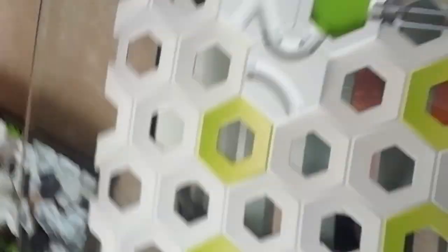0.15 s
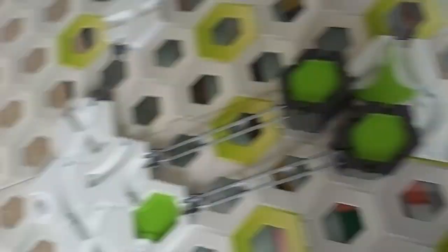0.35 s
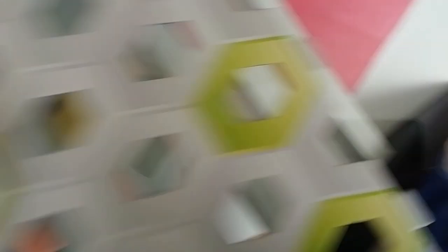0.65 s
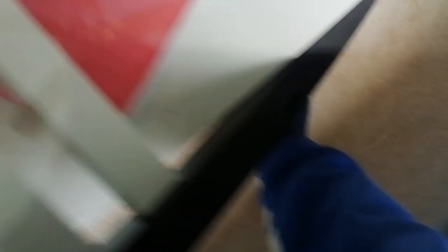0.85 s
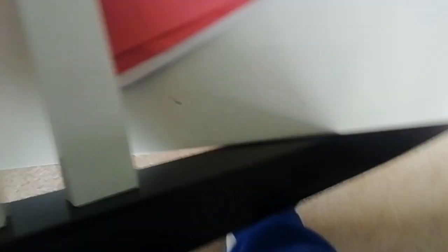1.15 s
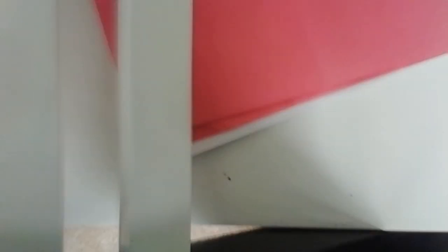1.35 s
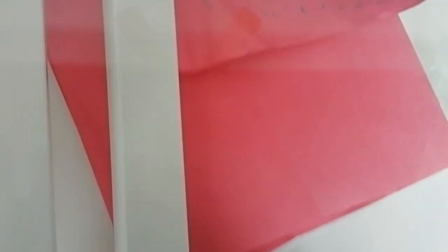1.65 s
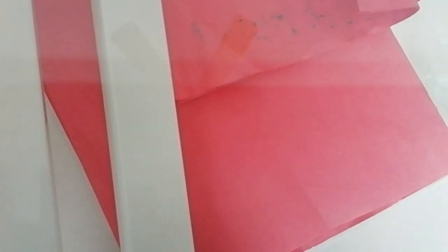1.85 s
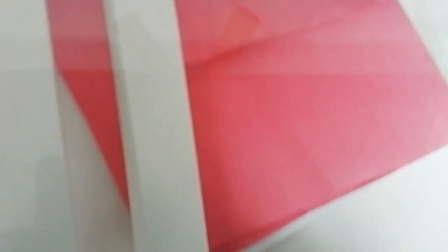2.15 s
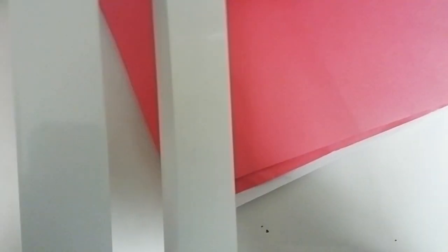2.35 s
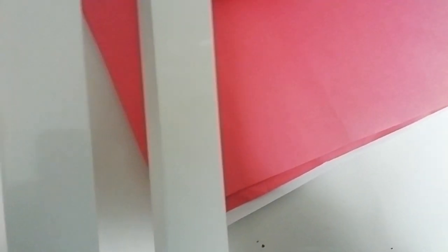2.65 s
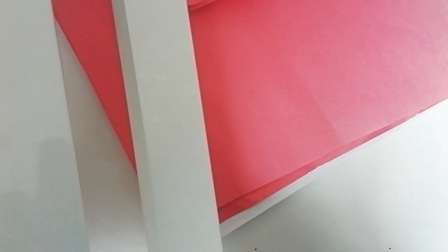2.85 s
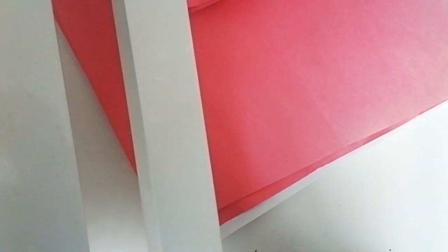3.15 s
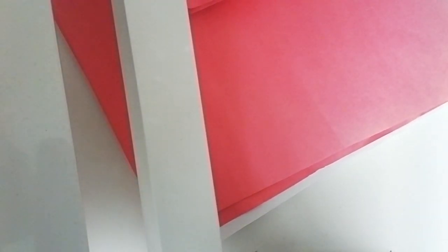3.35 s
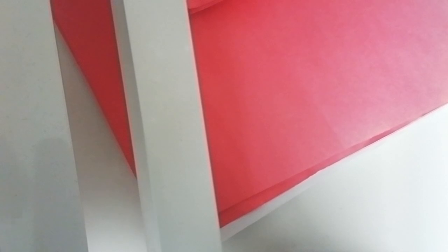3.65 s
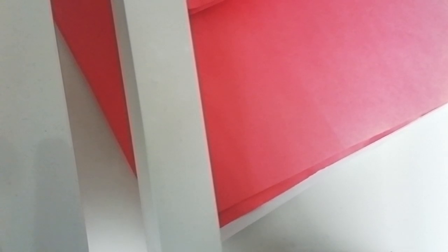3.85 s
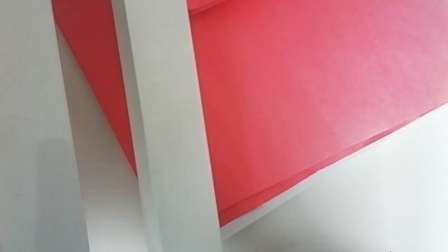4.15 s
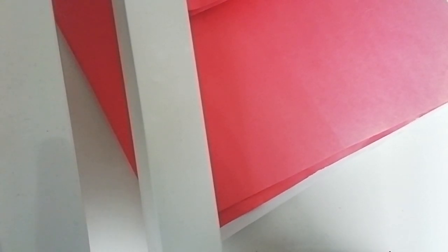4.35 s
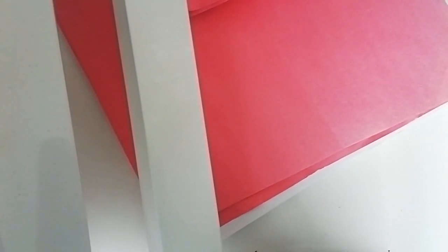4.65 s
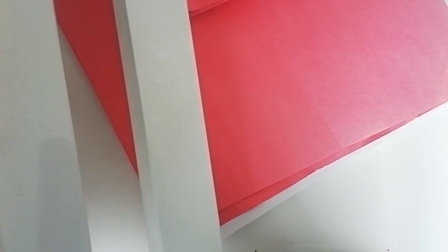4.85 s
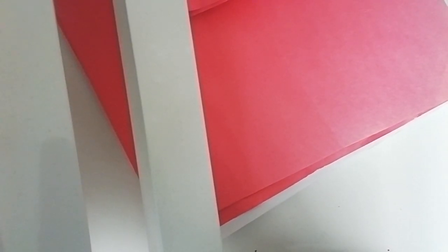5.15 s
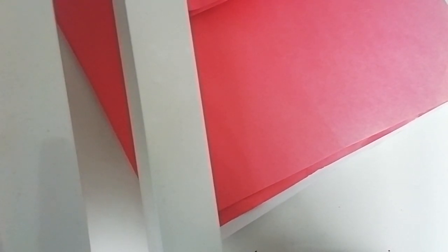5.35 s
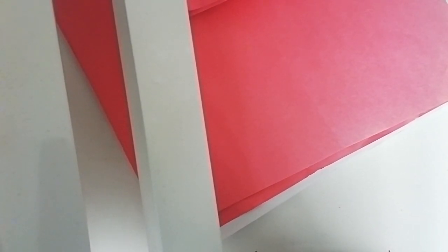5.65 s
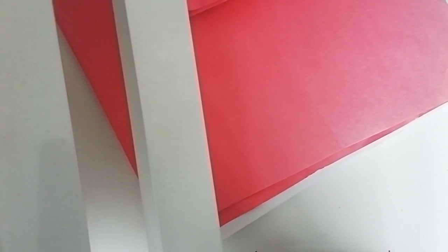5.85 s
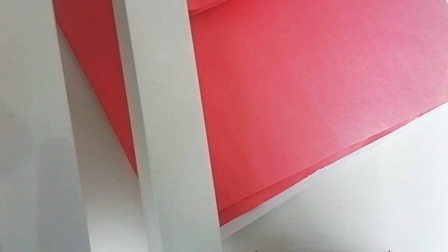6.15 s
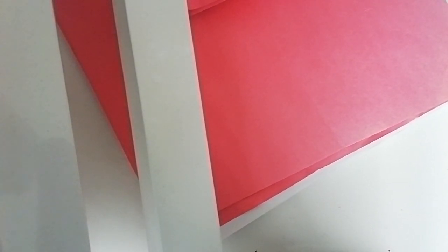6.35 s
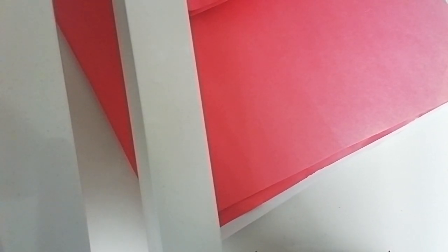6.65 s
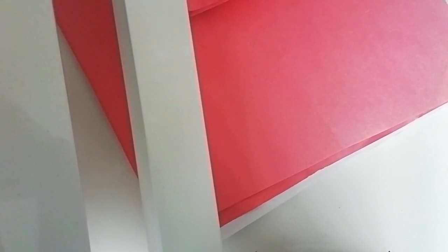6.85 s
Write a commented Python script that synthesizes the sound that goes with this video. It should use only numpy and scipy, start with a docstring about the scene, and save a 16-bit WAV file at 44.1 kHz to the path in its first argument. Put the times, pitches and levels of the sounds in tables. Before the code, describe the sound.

A hand-held phone is pushed into position beside a plastic marble run: soft padding, scuffs, sharp cracks and boomy bumps right at the microphone. Then it lies still in a quiet small room, while glass marbles and plastic pieces click irregularly nearby, with three loud glassy clinks in the middle and faint slides and creaks later. The left side is dull, the right open.

```python
"""Rubbing, bumps and hard knocks as a hand-held phone is pushed into place on a desk by a plastic marble run;
then glass marbles and plastic pieces click, creak and slide a little further off in a small room.
Contacts are band-split noise bursts with a ping; bumps are damped sines; rubbing is coloured grains and noise;
cup, joint and run ring as banks of decaying modes.
The right port is open; the left hears the sources through a low-pass, slightly late. Each port has its own hiss."""
import sys
import numpy as np
from scipy import signal
from scipy.fft import rfft, irfft
from scipy.io import wavfile
from scipy.ndimage import uniform_filter1d

SR = 44100
rng = np.random.default_rng(int(sys.argv[2]) if len(sys.argv) > 2 else 0)


def wav_record(signal):
    """Record a signal, one row per channel, as 16-bit PCM in the file named by sys.argv[1]."""
    frames = np.transpose(np.atleast_2d(signal))
    bounded = np.clip(frames, -1, 1)
    # unit amplitude maps onto the largest positive 16-bit level
    quanta = np.round(bounded * 32767).astype(np.int16)
    wavfile.write(sys.argv[1], SR, quanta)


N = 308700
TIME_S = np.arange(N) / SR

# Table levels hold before the mix gains.
# Strokes of skin and sleeve over the case. Each row: peak time in seconds, swell in seconds, release in seconds,
# hiss in dB, scuff in dB re hiss, fizz in dB re hiss.
RUB_STROKES = [(.46, 0.096, 0.16, -50, -10, -13), (.88, 0.287, 0.14, -62, -2.5, -12.5),
               (1.16, 0.24, 0.0505, -52.5, 5, -31.5), (1.52, 0.38, 0.36, -44.5, 3, -18.5),
               (1.664, 0.28, 0.14, -34, -8, -16), (1.84, 0.088, 0.064, -47.5, 6.5, -28),
               (2.005, .14, 0.047, -55.5, 5, -17), (2.19, 0.061, 0.204, -39, -22, -23),
               (2.26, 0.06, 0.1, -27.5, -7, -23.5), (2.317, 0.062, 0.044, -34.5, 0.5, -28),
               (2.68, .08, 0.44, -58, -4.5, -15.5), (3.14, 0.57, .3, -65.5, -6.5, -19)]
# The hand's tremble on the case. Each row: time in seconds, level in dB.
TREMBLE_LEVELS = [(0.0, -83), (0.13, -69), (0.65, -51), (0.88, -55), (1.1, -60), (1.25, -46.5),
                  (1.41, -45.5), (1.67, -46), (1.84, -62.5), (2.43, -55), (2.9, -72.5), (3.2, -73)]
# Hard knocks at the phone. Each row: start in seconds, level in dB, ping in Hz,
# weight (middle re treble) in dB, edge (top re treble) in dB.
KNOCKS = [(.0975, -62.5, 620, -3, -24.5), (.2433, -62.5, 4680, -9, -15), (.9483, -65, 710, -3, -22),
          (.9807, -61, 824, 4, -23), (1.0088, -56.5, 738.5, 6.5, -18), (1.0439, -20, 3230, -6, -19.5),
          (1.0708, -38, 1030, 5.5, -21.5), (1.1882, -53.5, 660, 1.5, -14), (1.2121, -18, 1770, -1, -18.5),
          (1.3776, -20.5, 4000, -1.5, -20.5), (1.644, -16, 1380, -1.5, -25.5), (1.7936, -38, 3470, -9, -20),
          (1.8034, -27, 2106, 3.5, -20.5), (2.3328, -22.5, 2950, -5.5, -23.5), (2.3885, -40, 4950, -43, -6),
          (2.4089, -49, 4540, -23, -12), (5.6909, -25.5, 3654, -21.5, -16.5)]
# Soft bumps through the case. Each row: start in seconds, envelope peak in dB, pitch in Hz, t60 in seconds.
BUMPS = [(.1, -47, 80, 0.034), (0.241, -46, 84, 0.037), (0.439, -34, 108, 0.062), (0.462, -27, 230, 0.0126),
         (0.474, -39.5, 63.5, 0.38), (.529, -30.5, 124, 0.037), (0.787, -38, 65, 0.16),
         (1.045, -17.5, 119, 0.024), (1.2132, -12.5, 80, 0.049), (1.246, -13.5, 90, 0.03),
         (1.378, -9, 70, .048), (1.646, -33, 140, 0.087), (1.803, -33, 100, 0.17), (2.235, -20, 65, 0.021),
         (2.339, -6, 52, .065), (2.344, -18, 213, 0.021), (2.752, -38, 250, 0.067),
         (2.765, -32, 95, 0.0985), (5.695, -44, 78, 0.1365), (5.695, -37.5, 295, 0.1187),
         (6.581, -43, 153, 0.092), (6.586, -49.5, 63, 0.248)]
# Fingertips padding on the case. Each row: start in seconds, level in dB.
FINGER_PADS = [(.4083, -71), (0.4426, -56), (0.4657, -61.5), (0.586, -60), (.6834, -63.5), (2.778, -67)]
# Loose marbles and pieces rattling after a jolt. Each row: start in seconds, length in seconds, level in dB.
RATTLES = [(1.216, 0.055, -22.5), (1.385, 0.01694, -20), (4.225, 0.016, -52), (5.71, 0.08, -51),
           (6.11, 0.085, -53), (6.19, .07, -47)]
# Marbles and pieces tapping in the room. Each row: start in seconds, level in dB, ping in Hz,
# weight (middle re treble) in dB, rebound in dB re the first contact.
TAPS = [(1.2283, -16, 4370, -7, -4.5), (1.2365, -16.5, 3933, -9, -13), (1.2608, -25.5, 4610, -17, -23.5),
        (1.297, -33, 3700, -4.5, -28), (1.3921, -18, 4090, -4, -11), (1.4691, -40.5, 3997, -3.5, -16.5),
        (3.1361, -65.5, 1953, 5.5, -21), (3.2601, -63, 2504, -7, -7), (3.7277, -66.5, 2242, 1, -11),
        (4.0109, -45, 4740, -6, -10.5), (4.108, -63, 3270, -3, -7), (4.1816, -57.5, 3665, -9, -3),
        (4.2289, -58, 1910, 2, -1.5), (4.3219, -52, 3430, -6.5, -6), (4.345, -51, 2620, -3.5, -3.5),
        (4.3883, -54, 1930, 0.5, -17), (4.426, -55, 4560, -8, -11.5), (5.174, -49.5, 2694, -18, -18),
        (5.213, -41.5, 5260, -4.5, -4.5), (5.257, -51, 5190, -8, -8), (5.4603, -49, 1070, 2, -18),
        (5.705, -38.5, 4137, -21.5, -6.5), (6.1047, -30, 4620, -11.5, -20), (6.1966, -52, 1250, 4.5, -5.5),
        (6.2209, -48.5, 3900, -3.5, -0.5), (6.5535, -56, 3920, -5, -4), (6.5828, -49, 2080, 1, -17.5),
        (6.8509, -53, 2470, 1.5, -23)]
# Tight plastic joints creaking. Each row: start in seconds, length in seconds, level in dB.
CREAKS = [(3.457, 0.089, -56), (6.708, 0.00796, -46.5), (6.731, 0.018, -54), (6.757, 0.021, -53),
          (6.797, 0.017, -51)]
# Pieces pushed along the desk. Each row: start in seconds, length in seconds, level in dB.
SLIDES = [(4.165, 0.1375, -60), (4.4, 0.047, -56.5), (5.289, 0.075, -64), (5.665, 0.0491, -62),
          (6.82, 0.084, -57)]
# Brief brushes of a hand on the plastic. Each row: start in seconds, length in seconds, level in dB.
BRUSHES = [(4.97, .055, -65.5), (5.64, 0.068, -63), (5.672, 0.059, -40), (5.81, 0.051, -60),
           (5.94, 0.086, -74)]
# A marble clicking into a plastic cup. Each row: start in seconds, level in dB, contact hardness (low-pass) in Hz.
CLINKS = [(4.4679, -13, 3100), (4.5327, -9.5, 5290), (4.596, -6.5, 4200)]

# Resonances of the plastic run and its desk, the cup, the joint. Each row: mode in Hz, level in dB, t60 in seconds.
RUN_MODES = [(308, -5.5, .22), (585, -10, .15), (829, -6, .12), (960, -4, .2), (1043, -2, .09),
             (1177, -1, .14), (1580, -4, .12), (2006, -3.5, .13), (2207, -6, .12), (2600, -5.5, .12),
             (3040, -3, .15), (3420, -1, .14), (3730, -2, .13), (4280, 0, .13), (4619, -3.5, .12)]
CUP_MODES = [(964, -15.5, 0.11), (1444, -14, 0.2), (2150, -8, 0.11), (2080, -5, 0.099), (2520, 1, 0.0427),
             (2750, 2.5, 0.041), (3070, 1, 0.041), (3880, -3, 0.065), (4390, -8, 0.25), (4850, 1.5, 0.046),
             (5380, -5, 0.11)]
JOINT_MODES = [(363, -4.5, 0.0555), (718, -11, 0.2), (1090, -12, 0.06), (1935, 2.5, 0.034),
               (2940, -4, 0.041), (3193, -5.5, 0.062), (4005, -1.5, 0.0395)]

# Relative spectra of the noises. Each row: frequency in Hz, gain in dB.
HISS_SPECTRUM = [(1200, -14.5), (2200, -7.5), (3300, -3), (4100, -2.5), (5000, -11.5), (6200, -18.5),
                 (10000, -41)]
SCUFF_SPECTRUM = [(120, -8.5), (250, 1), (550, -2), (750, -2.5), (1150, -1.5), (1900, -5.5), (3000, -45)]
FIZZ_SPECTRUM = [(4200, -22), (5800, -7.5), (8500, -0.5), (11000, -9), (16000, -14.5)]
RUMBLE_SPECTRUM = [(15, -10), (27, 5), (55, -9.5), (110, -12.5), (200, -21.5), (400, -34), (900, -54.5)]
SCRAPE_SPECTRUM = [(150, -14.5), (350, 1.5), (600, -1.5), (850, -5.5), (1300, -3), (1650, -15.5),
                   (2000, -9.5), (2600, -6.5), (4200, -4), (5500, -32.5), (10000, -38.5)]
RATTLE_SPECTRUM = [(400, -9), (1100, 2.5), (2000, -8), (4400, 3.5), (5600, -11.5), (8000, -27),
                   (15000, -41)]
AMBIENCE_SPECTRUM = [(12, -35), (20, -2), (70, -8.5), (297, -13.5), (340, -16), (613, -20), (686, -24.5),
                     (1180, -23), (1590, -28), (3280, -29.5), (4500, -30.5), (5850, -63.5), (9900, -120)]
PORT_SPECTRUM = [(100, 0), (2500, 3), (5000, 2), (10000, -1), (16000, -4.5)]
ROOM_SPECTRUM = [(150, 0), (500, 5), (1200, 5.5), (3000, 1.5), (5000, -4.5), (10000, -1)]

# Body, middle, treble and edge of a contact. Each row: lower limit in Hz, upper limit in Hz.
CONTACT_BANDS = [(180, 740), (870, 2100), (2200, 5200), (5000, 8000)]

AMBIENCE_DB = -63.5
WHINE_HZ, WHINE_DB = 1820, -79.5
LEFT_PORT_HZ, PORT_LAG_SAMPLES = 300, 23
TOP_HZ = 16000
BLOW_S, ONSET_S = .16, .01
RUB_FALL_DB = 20
BUMP_RISE_SHARE = 0.016  # of the t60
KNOCK_T60_S, TAP_T60_S = .026, .05  # at zero weight
NEAR_CRACK_DB, TAP_PING_T60_S = 3, .018
REBOUND_S, REBOUND_WEIGHT_DB = .0135, 2  # weight added to the first contact's
SPOT_SPREAD_DB, CUP_CRACK_T60_S = 1.5, .03


def undb(db):
    """Decibels to gain."""
    return 10 ** (np.asarray(db) / 20)


def unit(x):
    """Scale to rms 1."""
    return x / np.sqrt(np.mean(x ** 2))


def fade(t_s, t60_s):
    """Exponential decay, 60 dB down after t60."""
    return np.exp(-np.log(1000) * t_s / max(t60_s, 1e-3))


def colour(x, spectrum):
    """Filter by a spectrum, dB interpolated over log frequency."""
    hz, db = np.transpose(spectrum)
    bin_hz = np.maximum(np.fft.rfftfreq(len(x), 1 / SR), 1)
    gain = undb(np.interp(np.log(bin_hz), np.log(hz), db))
    return irfft(rfft(x) * gain, len(x))


def noise(spectrum):
    """Coloured noise of rms 1."""
    return unit(colour(rng.standard_normal(N), spectrum))


def walk(rate_hz):
    """Smooth random wander of rms 1: held random steps, averaged over one step."""
    hold = int(SR / rate_hz)
    steps = np.repeat(rng.standard_normal(N // hold + 1), hold)[:N]
    return unit(uniform_filter1d(steps, hold))


def grains(rate_hz, spread_db):
    """Tiny contacts at random moments, sizes uniform in dB over the spread; rms 1."""
    chance, size, sign = rng.random(N), rng.random(N), np.sign(rng.standard_normal(N))
    return unit((chance < rate_hz / SR) * sign * undb(-spread_db * size))


def add(out, start_s, x):
    """Mix x into out from its start time."""
    i = max(int(start_s * SR), 0)
    out[i:i + len(x)] += x[:max(N - i, 0)]


def strokes(table, ramp_s):
    """Level of short pushes that swell and let go."""
    push = np.zeros(N)
    for start_s, length_s, db in table:
        window = signal.windows.tukey(int(length_s * SR), min(2 * ramp_s / length_s, 1))
        add(push, start_s, undb(db) * window)
    return push


def ring(x, response):
    """Convolve x with a response scaled to unit energy."""
    return signal.fftconvolve(x, response / np.linalg.norm(response))[:N]


def modes(table, split, count=3):
    """Ring of a part; each mode is a few close partials, scattered by the share split."""
    t = TIME_S[:SR // 2]
    detune = 1 + split * rng.standard_normal((len(table), count, 1))
    response = 0
    for (hz, db, t60_s), ratios in zip(table, detune):
        partials = np.sin(2 * np.pi * hz * ratios * t).sum(axis=0)
        response = response + undb(db) * fade(t, t60_s) * partials
    return response


def self_noise(hiss_db=-76, right_db=3):
    """Each port has its own hiss, the open one more; a thin electrical whine wanders slightly on the left."""
    left, right = (undb(hiss_db) * noise(PORT_SPECTRUM) for _ in range(2))
    whine_phase = 2 * np.pi * np.cumsum(WHINE_HZ + 9 * walk(60)) / SR
    whine = undb(WHINE_DB) * np.sin(whine_phase)
    return np.array([left + whine, undb(right_db) * right])


def rub_levels():
    """Strokes swell and die by RUB_FALL_DB over their two times; pressing adds scuff, dry cloth adds fizz."""
    levels = np.zeros((3, N))
    for peak_s, swell_s, release_s, db, scuff_db, fizz_db in RUB_STROKES:
        away = np.maximum((peak_s - TIME_S) / swell_s, (TIME_S - peak_s) / release_s)
        stroke = undb(db - RUB_FALL_DB * np.minimum(away, 10))
        levels = np.maximum(levels, [stroke, stroke * undb(scuff_db), stroke * undb(fizz_db)])
    return levels


def rubbing(hiss_db=0, scuff_db=-1, fizz_db=-1, rumble_db=3, grain_db=2.5):
    """Skin and cloth catch and slip on the case in tiny jerks, over the rumble of the hand's tremble."""
    hiss, scuff, fizz = rub_levels()
    jerks = unit(colour(grains(rate_hz=3500, spread_db=24.0), HISS_SPECTRUM))
    friction = undb(hiss_db) * hiss * jerks
    friction = friction + undb(scuff_db) * scuff * noise(SCUFF_SPECTRUM)
    friction = friction + undb(fizz_db) * fizz * noise(FIZZ_SPECTRUM)
    tremble_db = np.interp(TIME_S, *np.transpose(TREMBLE_LEVELS), right=-120)
    tremble = undb(rumble_db + tremble_db) * noise(RUMBLE_SPECTRUM)
    roughness = unit(undb(grain_db * walk(160)))
    return friction * roughness + tremble


def contacts(table, t60_s, doubling_db, body_db):
    """The heavier a contact, the longer it rings and the more body it has."""
    return [(start_s, db, hz, t60_s * 2 ** (weight_db / doubling_db), body_db + weight_db, weight_db, edge_db)
            for start_s, db, hz, weight_db, edge_db in table]


def blows(table, crack_db, ping_db, ping_t60_s):
    """Hard contacts: a crack, the dense short ring of the piece, and one ping that stands out."""
    out, t = np.zeros(N), TIME_S[:int(BLOW_S * SR)]
    filters = [signal.butter(order, band, "band", fs=SR, output="sos")
               for order, band in zip((2, 3, 5, 2), CONTACT_BANDS)]
    for start_s, db, hz, t60_s, body_db, mid_db, edge_db in table:
        dense = rng.standard_normal(len(t)) * fade(t, t60_s)
        ping = np.sin(2 * np.pi * hz * t) * fade(t, ping_t60_s)
        blow = dense / np.linalg.norm(dense) + undb(ping_db) * ping / np.linalg.norm(ping)
        blow[0] += undb(crack_db)
        # each band is levelled over its onset
        for sos, rel_db in zip(filters, (body_db, mid_db, 0, edge_db)):
            part = signal.sosfilt(sos, blow)
            onset = np.std(part[:int(ONSET_S * SR)])
            add(out, start_s, part * undb(db + rel_db) / onset)
    return out


def marble_run(x):
    """The many plastic plates and the desk ring on after each blow."""
    return ring(x, modes(RUN_MODES, split=.04, count=8))


def room(x, t60_s, build_s=.008):
    """A small furnished room: reflections build up within milliseconds and die quickly."""
    t = TIME_S[:SR // 2]
    tail = colour(rng.standard_normal(len(t)), ROOM_SPECTRUM)
    build = (1 - np.exp(-t / max(build_s, 1e-4))) ** 2
    return ring(x, tail * fade(t, t60_s) * build)


def bumps():
    """Pushes on the case: low damped sines; a longer decay also builds more slowly."""
    out, t = np.zeros(N), TIME_S[:SR // 2]
    for start_s, db, hz, t60_s in BUMPS:
        rise = (1 - np.exp(-t / max(BUMP_RISE_SHARE * t60_s, 1e-4))) ** 2
        envelope = rise * fade(t, t60_s)
        add(out, start_s, undb(db) * envelope / envelope.max() * np.sin(2 * np.pi * hz * t))
    return out


def fingertips(ping_hz=620, t60_s=0.024, body_db=13, mid_db=-12, edge_db=-12):
    """Contacts of one hollow thud, with a faint click of the nail."""
    return [(start_s, db, ping_hz, t60_s, body_db, mid_db, edge_db) for start_s, db in FINGER_PADS]


def rattles():
    """Many small collisions, each with a ring of a few milliseconds."""
    t = TIME_S[:SR // 50]
    click = rng.standard_normal(len(t)) * fade(t, .005)
    clicks = ring(grains(rate_hz=1000, spread_db=22), click)
    return strokes(RATTLES, ramp_s=0.0023) * unit(colour(clicks, RATTLE_SPECTRUM))


def with_rebounds(edge_db=-19, rebound_edge_db=-17):
    """Each tapped piece falls back once, flatter: a weaker, weightier second contact."""
    first = [(start_s, db, hz, weight_db, edge_db) for start_s, db, hz, weight_db, _ in TAPS]
    second = [(start_s + REBOUND_S, db + rebound_db, hz, weight_db + REBOUND_WEIGHT_DB, rebound_edge_db)
              for start_s, db, hz, weight_db, rebound_db in TAPS]
    return first + second


def creaks(tone_db=1.5, hoarse_db=-6):
    """Dense, uneven slips ring the joint, with a hoarse scrape beside the tones."""
    push = strokes(CREAKS, ramp_s=0.0019)
    slips = push * grains(rate_hz=1400, spread_db=28)
    tones = ring(slips, modes(JOINT_MODES, split=0.0069))
    return undb(tone_db) * tones + undb(hoarse_db) * push * noise(SCRAPE_SPECTRUM)


def slides(judder_db=3):
    """Plastic judders over the desk; a hand brushes the plastic."""
    scrape = unit(noise(SCRAPE_SPECTRUM) * undb(judder_db * walk(400)))
    brush = strokes(BRUSHES, ramp_s=0.024) * noise(HISS_SPECTRUM)
    return strokes(SLIDES, ramp_s=0.017) * scrape + brush


def clinks(gain_db=4, crack_db=-3):
    """Glass strikes the cup, each time at another spot; a softer contact leaves the high modes quiet."""
    out, t = np.zeros(N), TIME_S[:SR // 2]
    # so small a wall radiates no bass, and the plastic swallows the top
    wall = signal.butter(6, (980, 6800), "band", fs=SR, output="sos")
    for start_s, db, hardness_hz in CLINKS:
        struck = [(hz, mode_db + SPOT_SPREAD_DB * rng.standard_normal(), t60_s)
                  for hz, mode_db, t60_s in CUP_MODES]
        tones = unit(modes(struck, split=.03, count=4))
        crack = unit(rng.standard_normal(len(t)) * fade(t, CUP_CRACK_T60_S))
        contact = signal.butter(4, hardness_hz, fs=SR, output="sos")
        cup = signal.sosfilt(contact, tones + undb(crack_db) * crack)
        cup = signal.sosfilt(wall, cup)
        add(out, start_s, undb(db + gain_db) * cup / np.linalg.norm(cup))
    return out


def scene():
    """All sources meet at the open right port; the muffled left port gets a dull, late copy."""
    near = contacts(KNOCKS, t60_s=KNOCK_T60_S, doubling_db=19.5, body_db=-6.5) + fingertips()
    far = contacts(with_rebounds(), t60_s=TAP_T60_S, doubling_db=12.5, body_db=-12)
    knocks = blows(near, crack_db=NEAR_CRACK_DB, ping_db=-8, ping_t60_s=.008)
    taps = blows(far, crack_db=-17.5, ping_db=-10, ping_t60_s=TAP_PING_T60_S)
    desk_parts = taps + slides() + rattles()
    small_parts = clinks() + creaks()
    direct = undb(0.5) * knocks + undb(2.5) * desk_parts + small_parts
    plates = marble_run(undb(-15) * knocks + undb(-14.5) * desk_parts)
    to_room = undb(-19.5) * knocks + undb(-6.5) * desk_parts + undb(-11.5) * small_parts
    echo = room(to_room, t60_s=0.15)
    ambience = noise(AMBIENCE_SPECTRUM) * undb(AMBIENCE_DB + .8 * walk(1.7))
    right = direct + plates + echo + bumps() + rubbing() + ambience
    muffled = signal.sosfilt(signal.butter(1, LEFT_PORT_HZ, fs=SR, output="sos"), right)
    left = np.pad(muffled, (PORT_LAG_SAMPLES, 0))[:N]
    return np.array([left, right]) + self_noise()


def record(dry):
    """Peaks clip at full scale; a steep low-pass then cuts the top."""
    low_pass = signal.ellip(8, .2, 70, TOP_HZ, fs=SR, output="sos")
    return signal.sosfilt(low_pass, np.clip(dry, -1, 1))


dry = scene()
out = record(dry)
wav_record(out)
```